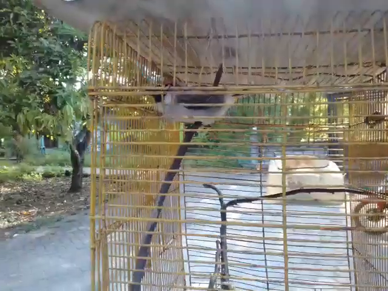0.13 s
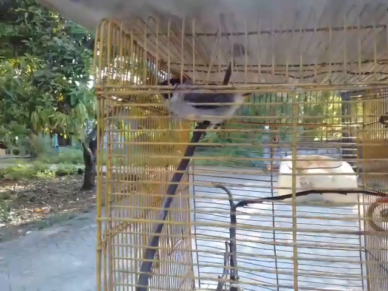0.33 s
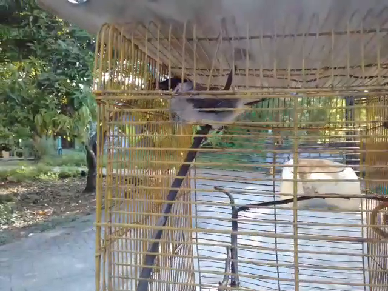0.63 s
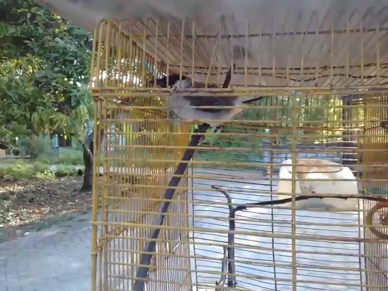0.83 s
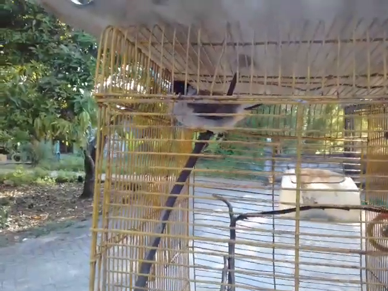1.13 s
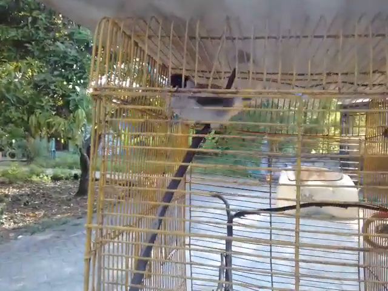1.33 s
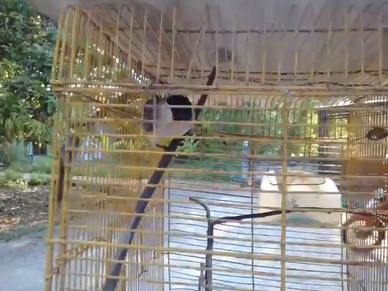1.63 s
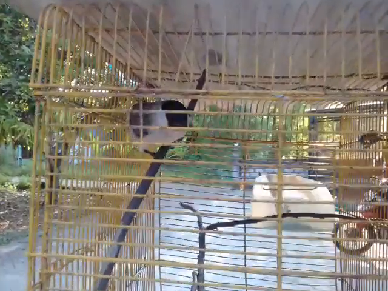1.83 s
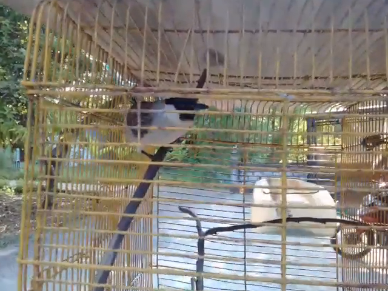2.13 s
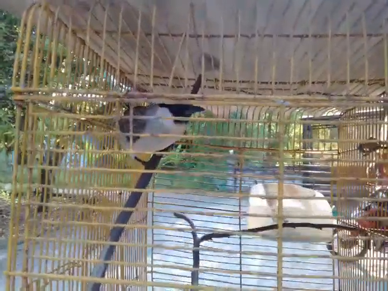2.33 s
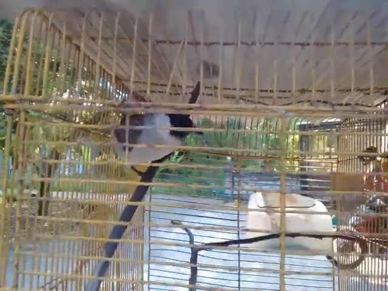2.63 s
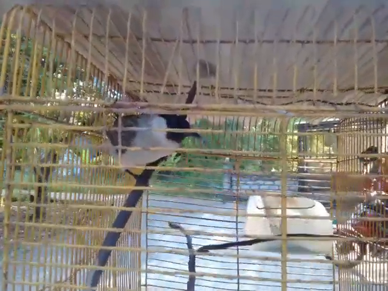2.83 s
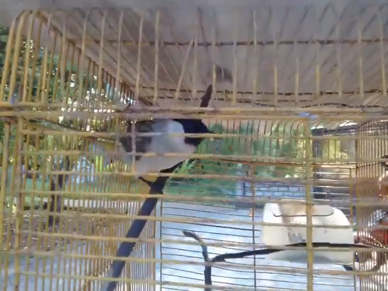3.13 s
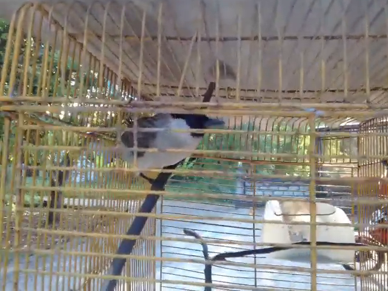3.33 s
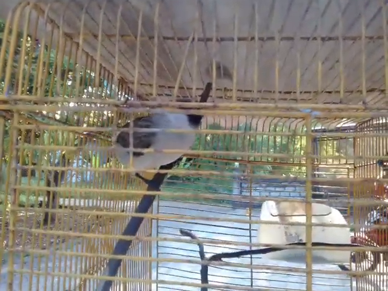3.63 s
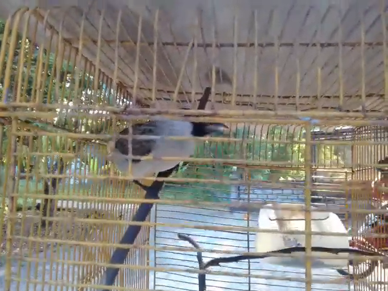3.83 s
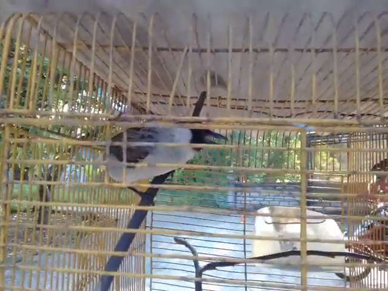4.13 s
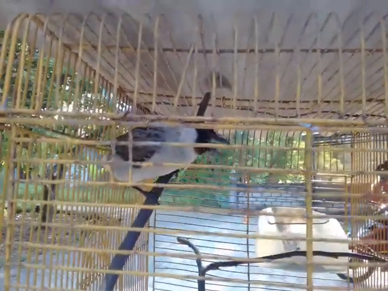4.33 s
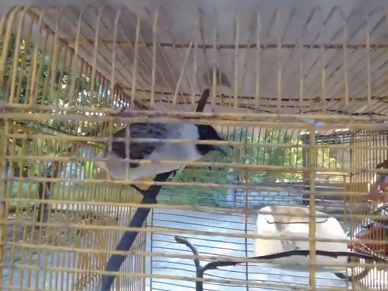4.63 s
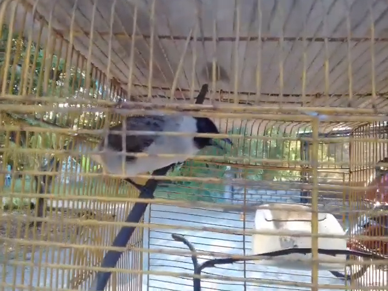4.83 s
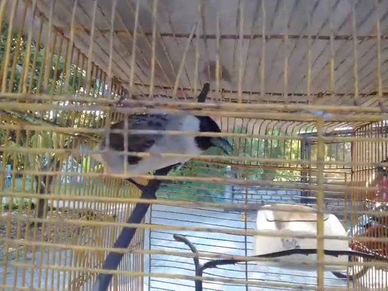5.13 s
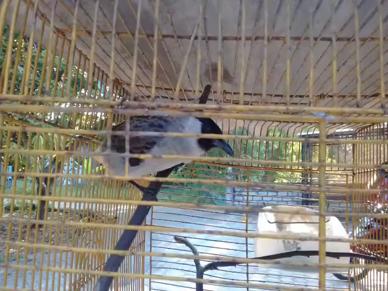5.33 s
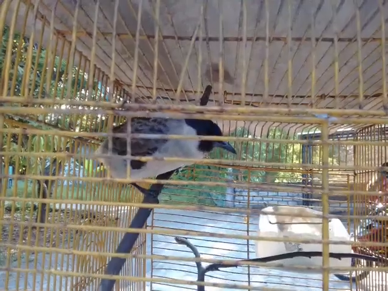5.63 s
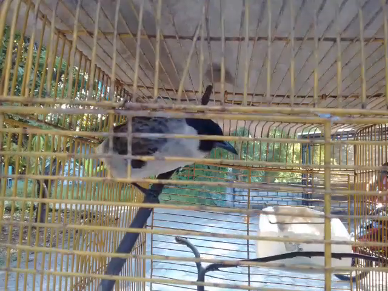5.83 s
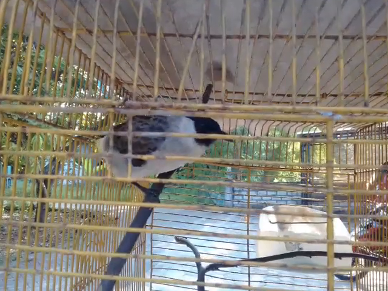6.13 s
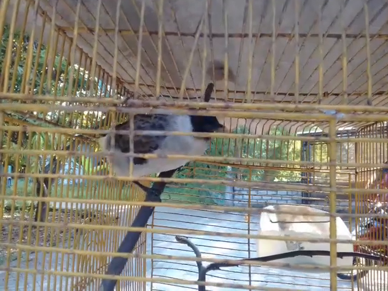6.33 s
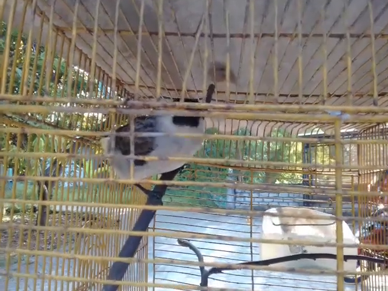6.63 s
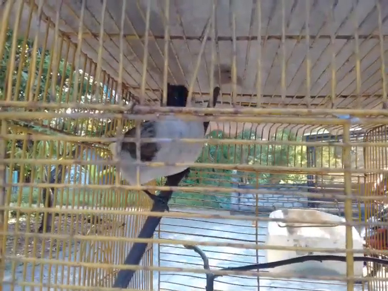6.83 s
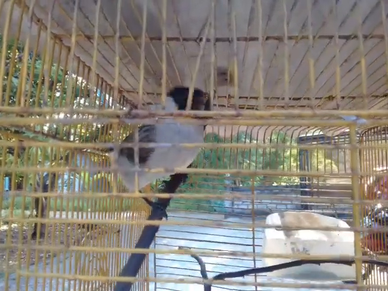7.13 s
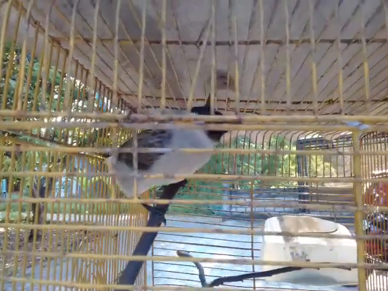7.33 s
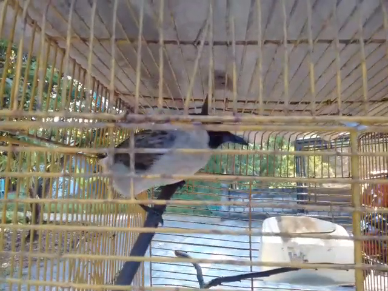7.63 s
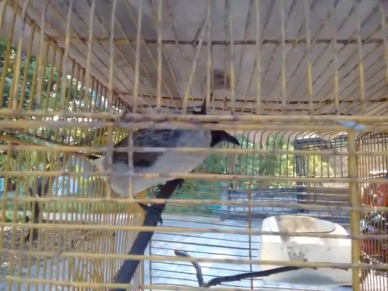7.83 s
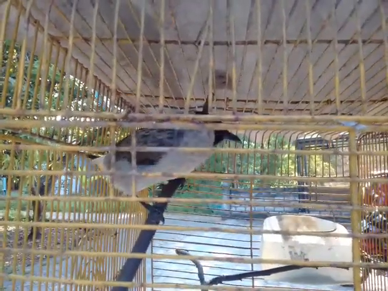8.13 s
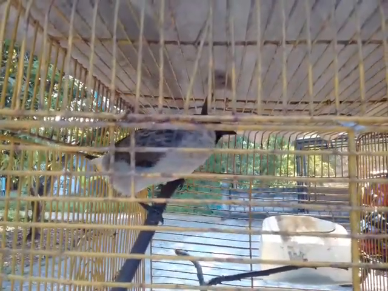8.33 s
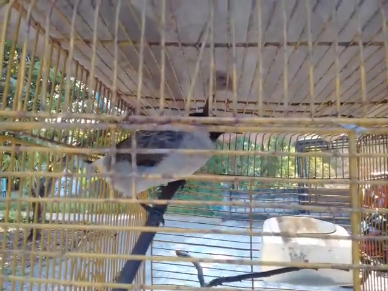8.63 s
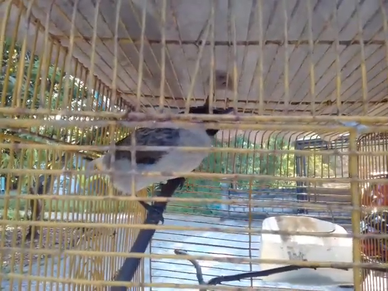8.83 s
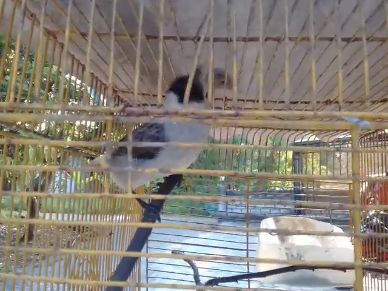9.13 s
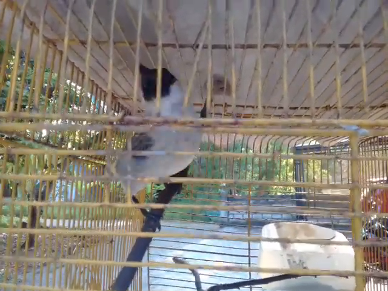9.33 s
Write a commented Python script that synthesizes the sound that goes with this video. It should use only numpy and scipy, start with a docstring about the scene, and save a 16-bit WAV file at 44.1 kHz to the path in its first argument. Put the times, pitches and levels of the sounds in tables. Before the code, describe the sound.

A caged songbird whistles and chirrups close by in short bright phrases, with a few knocks and a faint outdoor hiss.

```python
"""Over a faint outdoor rumble and microphone hiss, a bulbul whistles and chirrups close by, in a wire
cage under an awning; later it sings runs of chip, warbled whistle and falling chirrup. Its syrinx is a
gliding oscillator whose rasp adds pitch jitter, subharmonics and breath noise. A bird rasps faintly,
things swish and knock, claws tick, other birds call from trees and cages, and a far motor grows near
the end. Near surfaces return discrete reflections; the open yard adds a short diffuse tail."""
import sys
import numpy as np
from scipy import signal
from scipy.fft import rfft, irfft, next_fast_len
from scipy.io import wavfile
from scipy.ndimage import uniform_filter1d, minimum_filter1d, map_coordinates

SR = 44100
rng = np.random.default_rng(int(sys.argv[2]) if len(sys.argv) > 2 else 0)


def waveform_to_disk(signal):
    """Save audio, clipped to [-1, 1], as 16-bit WAV at the path in sys.argv[1]."""
    frames = np.transpose(np.atleast_2d(signal))
    scaled = np.clip(frames, -1, 1) * 32767
    samples = np.round(scaled).astype(np.int16)
    wavfile.write(sys.argv[1], SR, samples)


N = 418509
TOP_HZ = 15750  # band limit


def amp(db):
    """Decibels to amplitude ratio."""
    return 10 ** (np.asarray(db) / 20)


def unit(x):
    """Normalisation to rms 1."""
    return x / np.sqrt(np.mean(x ** 2) + 1e-20)


def along(points, hz):
    """Interpolation of (frequency_hz, value) points on a log frequency axis."""
    knots_hz, values = np.transpose(points)
    return np.interp(np.log(hz + 1), np.log(knots_hz + 1), values)


def curves(rows, t):
    """Linear interpolation of each column after the first, time_s, at times t."""
    time_s, *columns = np.transpose(rows)
    return [np.interp(t, time_s, column) for column in columns]


def clock(length_s):
    """Sample times in seconds."""
    return np.arange(int(length_s * SR)) / SR


def wobble(rate_hz, n):
    """Smooth random modulation: a spline through rate_hz Gaussian knots a second."""
    knots = rng.standard_normal(int(n * rate_hz / SR) + 4)
    return map_coordinates(knots, [np.arange(n) * rate_hz / SR])


def filtered(x, response):
    """Zero-phase filtering: the spectrum times a response of frequency."""
    size = next_fast_len(len(x) + 8192)
    return irfft(rfft(x, size) * response(np.fft.rfftfreq(size, 1 / SR)), size)[:len(x)]


def noise(spectrum, n):
    """White noise shaped by (frequency_hz, density_db) points, at rms 1."""
    return unit(filtered(rng.standard_normal(n), lambda hz: amp(along(spectrum, hz))))


def add(track, start_s, x):
    """Superposition of x on the track."""
    part = track[max(0, round(start_s * SR)):][:len(x)]
    part += x[:len(part)]


def phase_of(hz):
    """Phase is the time integral of frequency."""
    return 2 * np.pi * np.cumsum(hz) / SR


def background(rumble_gain_db=-1.5, yard_gain_db=2, hiss_db=-54, motor_hz=186):
    """Traffic, yard and microphone hiss are broadband noise; a far motor adds a harmonic series."""
    # Background level over time, ducking while the bulbul sings loudly: time_s, rumble_db, yard_db
    levels = [(0.6, -58.5, -59.5), (0.75, -58, -56.5), (1.41, -53, -56), (1.69, -62, -57),
              (2.65, -65.5, -58), (3.97, -64, -56), (4.51, -67, -58.5), (5.33, -66.5, -61.5),
              (6.09, -71, -59.5), (6.94, -65, -54), (8.08, -63, -52), (8.5, -63, -53), (9.49, -60.5, -52.5)]
    # Spectra of distant traffic, open yard and microphone: frequency_hz, density_db
    rumble_spectrum = [(25, -27.5), (45, -15), (70, -7.5), (110, 0.5), (180, 1.5), (230, 1.5), (290, -4),
                       (450, -9.5), (650, -23)]
    yard_spectrum = [(250, -19.5), (480, -5.5), (1100, -6.5), (2000, -6), (3500, -7.5), (6000, -19.5),
                     (9000, -27.5)]
    hiss_spectrum = [(3530, -55), (6000, -15), (6740, -9), (7330, -11.5), (8560, -10), (10200, 2.5),
                     (10900, 4.5), (12200, -11.5), (12900, -19.5), (15600, -20.5)]
    # Harmonics of the motor: order, level_db
    motor_orders = [(1, -5), (2, -9), (3, 0)]
    # Envelopes of the motor and of the whole background: time_s, gain_db
    motor_swell = [(0, -79), (7.9, -77), (8.4, -63.5), (9.49, -58.5)]
    fade_in = [(0, -120), (.38, -90), (.41, -10), (.48, -7.5), (.62, 0.5)]
    t = np.arange(N) / SR
    rumble_db, yard_db = curves(levels, t)
    rumble = amp(rumble_db + rumble_gain_db + 0.63 * wobble(6.8, N)) * noise(rumble_spectrum, N)
    yard = amp(yard_db + yard_gain_db + .7 * wobble(6, N)) * noise([(60, -50)] + yard_spectrum, N)
    shaft = phase_of(motor_hz + 4 * wobble(25, N))
    hum = sum(amp(db + 4.5 * wobble(8, N)) * np.sin(k * shaft) for k, db in motor_orders)
    motor = amp(curves(motor_swell, t)[0]) * hum
    hiss = amp(hiss_db) * noise(hiss_spectrum, N)
    return (rumble + yard + motor + hiss) * amp(curves(fade_in, t)[0])


def note(length_s, hz, db, rasp, slide_hz=0, bow_hz=0, rise_db=0, fade_db=0, crest=0.55):
    """Contours of pitch, level and rasp: a parabolic glide that swells to a crest and fades."""
    progress = np.linspace(0, 1, int(length_s * SR))
    pitch = hz + slide_hz * progress + bow_hz * (1 - (2 * progress - 1) ** 2)
    level = db - np.interp(progress, [0, np.clip(crest, .05, .95), 1], [rise_db, 0, fade_db])
    return np.array([pitch, level, np.full(len(progress), np.clip(rasp, 0, 1))])


def warbled(contours, rate_hz, depth_hz, depth_db, first_top_s, drift_rad=0.14, uneven_db=2.5):
    """Frequency and amplitude modulation by one slightly uneven swing."""
    hz, db, rasp = contours
    n = len(hz)
    angle = 2 * np.pi * rate_hz * (np.arange(n) / SR - first_top_s) + drift_rad * wobble(rate_hz, n)
    swing = np.cos(angle) * amp(uneven_db * wobble(rate_hz, n))
    return np.array([hz + depth_hz * swing, db + depth_db * swing, rasp])


def legato(*notes, glide_s=0.0047, edge_s=0.0044, quiet_db=-23.5):
    """Smoothing joins notes under one envelope, giving rows of time_s, pitch_hz, level_db, rasp."""
    hz, db, rasp = uniform_filter1d(np.hstack(notes), size=int(glide_s * SR), axis=1)
    t = np.arange(len(hz)) / SR
    opening = np.minimum(1, np.minimum(t, t[-1] - t) / edge_s)
    return np.transpose([t, hz, db + quiet_db * (1 - opening), rasp])


def whistle():
    """A frequency-modulated note sinks, climbs back and settles on a nearly pure, sagging tone."""
    sink = note(.036, 3508, db=0.5, rasp=0.26, slide_hz=-430, bow_hz=60.4,
                rise_db=12.5, fade_db=5.5, crest=0.53)
    warble = warbled(sink, rate_hz=82, depth_hz=475, depth_db=3.5, first_top_s=.0028)
    climb = note(.012, 3540, db=-1.5, rasp=0.16, slide_hz=120, bow_hz=-62,
                 rise_db=3, fade_db=3.5, crest=.3)
    pure = note(0.057, 4063, db=1.5, rasp=.02, slide_hz=-321.4, bow_hz=20,
                rise_db=8.5, fade_db=9.5, crest=0.7)
    return legato(warble, climb, pure)


def chirrup(low_db, scoop_hz):
    """The fundamental leaps nearly an octave, holds, catches, falls back and flicks up."""
    low = note(.032, 1800, db=low_db, rasp=.24, slide_hz=-51, bow_hz=-59,
               rise_db=9, fade_db=0.5, crest=0.78)
    held = note(.0375, 3234 - scoop_hz, db=3, rasp=0.048, slide_hz=scoop_hz,
                bow_hz=70 + 0.43 * scoop_hz, rise_db=8, fade_db=4, crest=.36)
    catch = note(0.0077, 2640, db=1, rasp=.1)
    sag = note(.031, 2918, db=2, rasp=0.15, slide_hz=-350.6, bow_hz=70.5,
               rise_db=1.5, fade_db=2.5, crest=0.93)
    fall = note(.0145, 2567.4, db=0, rasp=0.13, slide_hz=-710, bow_hz=-92.5, fade_db=11.5, crest=0.085)
    flick = note(.019, 3130, db=3, rasp=0.13, slide_hz=-51, rise_db=5.5, fade_db=16, crest=0.11)
    return legato(low, held, catch, sag, fall, flick)


def syrinx(shape, stretch, pitch_ratio, first_db, second_db, octave_db, upper_db):
    """Source and filter: a harmonic oscillator; rasp adds jitter, period doubling and breath noise."""
    # Interference of close reflections at the fundamental: frequency_hz, gain_db
    interference = [(1750, 6.5), (2100, 3), (2350, 3), (2650, 5.5), (2900, -9.5), (3060, -4.5), (3330, 2),
                    (3530, -0.5), (3780, 4), (4000, 0.5), (4500, -4)]
    # Response of beak and microphone to the overtones: frequency_hz, gain_db
    overtone_response = [(3400, -15), (4200, -16), (5600, -32), (6650, -44.5), (7650, -33), (8500, -29.5),
                         (10000, -9), (11300, 3.5), (12200, -4), (13300, -20), (14000, -10.5), (15500, -22)]
    # Air passing the syrinx: frequency_hz, density_db
    breath_spectrum = [(1000, -32), (2800, -22.5), (4500, 3), (6500, -8), (9000, 7.5), (11500, -3.5),
                       (15500, -13)]
    length_s = shape[-1][0]
    t = clock(length_s * stretch) / stretch
    hz, db, rasp = uniform_filter1d(np.array(curves(shape, t)), size=64, axis=1)
    hz = hz * pitch_ratio
    jitter = (.0015 + .025 * rasp) * wobble(1500, len(t)) + .025 * rasp * wobble(250, len(t))
    phase = phase_of(hz * (1 + jitter))
    tone = amp(along(interference, hz)) * np.sin(phase)
    doubled_period = np.sin(phase / 2) + 0.81 * np.sin(1.5 * phase)
    tone += (amp(-45) + rasp * amp(-31)) * doubled_period
    for k in np.arange(2, 7, .5):
        lift_db = octave_db if k == 2 else upper_db + 5 * rasp
        rolloff_db = 3 * max(0, k - 4)
        strength = amp(along(overtone_response, k * hz) + lift_db - rolloff_db)
        if k % 1:  # lines halfway between the harmonics
            strength *= amp(-3) * (rasp + 0.034)
        tone += strength * (k * hz < SR / 2) * np.sin(k * phase)
    tone += amp(-25) * rasp * noise(breath_spectrum, len(t))
    flutter_db = 2.5 * rasp * wobble(400, len(t))
    effort_db = np.interp(t / length_s, [.42, .55], [first_db, second_db])
    return np.sqrt(2) * amp(db + effort_db + flutter_db) * tone


def reverberation(x, gap_s=0.0087):
    """The yard's diffuse field: convolution with decaying noise that dies fastest near 8 kHz."""
    # Reverberation time of the yard: frequency_hz, t60_s
    decay = [(300, 0.32), (3000, 0.53), (8000, 0.077), (14000, 0.29)]
    hz, t, spectra = signal.stft(rng.standard_normal(SR * 3 // 4), SR, nperseg=256)
    envelope = amp(-60 * t / along(decay, hz)[:, None])
    tail = signal.istft(spectra * envelope, SR, nperseg=256)[1]
    tail[:int(gap_s * SR)] = 0
    return signal.fftconvolve(x, tail / np.linalg.norm(tail))


def bulbul(wet_db=-19):
    """The song arrives as direct sound, early reflections and a reverberant tail."""
    # Syllables: start_s, stretch, pitch_ratio, first_half_db, second_half_db, octave_db, upper_db
    whistles = [(0.419, 0.92, 0.98, -31, -24, 1, -37), (3.547, 0.91, 0.98, -12.5, -12, -3, -30),
                (4.011, 0.91, 0.98, -7, -10, 12, -25.5), (4.483, 0.9, 1.007, -8.5, -8.5, 12.5, -20.5),
                (5.025, 0.91, 0.98, -9.5, -11, 14, -18), (7.177, 0.84, 0.965, -20.5, -16, 5, -20.5),
                (9.238, 0.85, 0.97, -20.5, -16.5, 16, -19.5)]
    chips = [(3.484, 0.59, 1.07, -10, -17.5, -6, -27), (3.924, 0.93, 0.99, -10, -12, 5, -20),
             (4.394, 1, 1.006, -9.5, -12.5, 9.5, -25), (4.933, 0.92, 1.047, -9.5, -14.5, 11, -23.5),
             (7.088, 0.98, .98, -53, -28, -13, -23), (9.148, 1, .98, -55, -29, 23, -21)]
    peeps = [(6.988, 1, 0.95, -35.5, -38, -14, -10), (9.077, 0.75, 0.95, -37.5, -39.5, 4, 3)]
    # Chirrups: the same columns, then low_note_db, scoop_hz
    chirrups = [(0.569, 1.02, 1.015, -24.5, -18, 8.5, -12, -14.5, -1),
                (3.701, 1.016, 1.025, -16.5, -15.5, 3, -4, -16, -0.5),
                (4.166, 1.011, 1.024, -14.5, -13, 5, -1, -17, -0.5),
                (4.648, 1.026, 1.016, -14.5, -15, 5.2, -1, -17, 2),
                (5.194, 1.037, .995, -19, -17.5, 5.5, 0.5, -14.5, 75.5),
                (7.314, 1.06, .99, -28.5, -22.5, -2.5, -9.5, -35, 399),
                (9.387, 1.05, 0.99, -30, -21.5, 4, -6, -7.5, 81)]
    # Reflections from awning and walls: delay_s, gain_db
    reflections = [(.0031, -14.5), (.0074, -13.5), (.0128, -21.5), (.0265, -32.5), (.036, -43.5)]
    syllables = []
    for contour, rows in ((chip, chips), (whistle, whistles), (peep, peeps)):
        syllables += [(start_s, contour(), manner) for start_s, *manner in rows]
    for start_s, *manner, low_db, scoop_hz in chirrups:
        syllables.append((start_s, chirrup(low_db, scoop_hz), manner))
    direct, reflected = np.zeros(N), np.zeros(N)
    for start_s, shape, manner in syllables:
        call = syrinx(shape, *manner)
        add(direct, start_s, call)
        add(reflected, start_s, amp(wet_db) * reverberation(call))
    for delay_s, db in reflections:
        add(reflected, delay_s, amp(db) * direct)
    return direct + reflected


def rasp_and_swishes(gain_db=-3, wet_db=-6):
    """A bird's faint harsh rasp, then soft swishes: amplitude-modulated bands of noise."""
    # The rasp (first row) and the swishes: crest_s, rise_s, fall_s, centre_hz, level_db
    bursts = [(0.828, 0.026, 0.068, 5880, -36), (1.15, .03, 0.033, 4970, -40),
              (1.35, .1, 0.11, 4920, -34.5), (6.186, .04, .13, 5190, -42.5),
              (6.31, .035, 0.043, 5460, -35.5), (6.62, 0.066, 0.098, 5630, -43.5),
              (8.372, 0.061, 0.036, 4200, -49.5)]
    # Their spectrum: ratio_to_centre, density_db
    colour = [(.4, -20), (.7, -8.5), (.9, -2), (1.1, -3), (1.45, -21), (2, -6), (2.8, -30.5)]
    out = np.zeros(N)
    for crest_s, rise_s, fall_s, centre_hz, db in bursts:
        t = clock(rise_s + fall_s)
        from_crest = np.interp(t, [0, rise_s, rise_s + fall_s], [-1, 0, 1])
        swell_db = -20 * np.abs(from_crest) ** 1.5 + 1.3 * wobble(200, len(t))
        spectrum = [(centre_hz * ratio, level) for ratio, level in colour]
        burst = amp(db + gain_db + swell_db) * noise(spectrum, len(t))
        add(out, crest_s - rise_s, burst)
        add(out, crest_s - rise_s, amp(wet_db) * reverberation(burst))
    return out


def claws(gain_db=-5, t60_s=0.04):
    """Light impacts on perch and wire: bright noise bursts with exponential decay."""
    # Claw ticks: start_s, level_db
    ticks = [(1.084, -45), (1.2304, -31.5), (1.497, -24.5), (2.062, -33), (3.1462, -38), (3.2899, -35.5),
             (5.5847, -39), (5.998, -34.5), (6.509, -33), (8.266, -36)]
    # Their spectrum: frequency_hz, density_db
    spectrum = [(300, -20), (2000, -5.5), (7000, -14.5), (11000, 11), (15000, -19)]
    out, t = np.zeros(N), clock(0.082)
    for start_s, db in ticks:
        add(out, start_s, amp(db + gain_db - 60 * t / t60_s) * noise(spectrum, len(t)))
    return out


def knocks(gain_db=-10, wet_db=-4, crack_t60_s=0.041, clatter_t60_s=0.085, ring_t60_s=0.097):
    """Each impact excites a broadband crack and clatter and a hollow ring of damped modes."""
    # Blows in the yard: start_s, level_db, body_db, treble_db
    blows = [(1.154, -36, 9.5, 16), (1.758, -30.5, -12, -13.5), (3.21, -43.5, 8, -16),
             (3.408, -34, -9.5, -23), (3.458, -25, -5, -11.5), (3.677, -35.5, 1.5, -20.5),
             (5.485, -23.5, -4.5, -4.5), (5.808, -29.5, -5, -9.5), (6.634, -26.5, -8.5, -4.5),
             (6.873, -17, -12, -5), (6.911, -11.5, -4.5, -3.5), (7.795, -25, -7, -11),
             (7.861, -22, 3.5, 12), (7.911, -8, -3, -3)]
    # Spectrum of the clatter: frequency_hz, density_db
    spectrum = [(120, -49), (250, -8.5), (450, -18), (750, -11), (1150, 6), (1450, -1), (1900, 2),
                (3500, -5), (5800, -9.5), (8600, -7), (10800, 6), (15500, -28)]
    # Modes of the ring: frequency_hz, width_hz, level_db
    modes = [(493.4, 80, -4.5), (722, 87, 1), (955, 150, 0.5), (1120, 116, 2), (1592, 40, -0.5),
             (1870, 79, -20.5), (2360, 92, -9)]
    out, t = np.zeros(N), clock(.2)
    attack = 1 - np.exp(-t / 0.00224)
    decay = amp(-60 * t / clatter_t60_s) + amp(-2 - 60 * t / crack_t60_s)
    for start_s, db, body_db, treble_db in blows:
        tint = [(1200, body_db), (3500, 0), (10000, treble_db)]
        clatter = unit(filtered(noise(spectrum, len(t)), lambda hz: amp(along(tint, hz))))
        ring = np.zeros(len(t))
        for mode_hz, width_hz, mode_db in modes:
            strength = amp(mode_db + rng.normal(0, 3.8))
            ring += strength * np.sin(phase_of(mode_hz + width_hz / 2 * wobble(130, len(t))))
        ring = unit(ring) * amp(body_db - 5 - 60 * t / ring_t60_s)
        knock = (clatter * decay + ring) * amp(db + gain_db) * attack
        add(out, start_s, knock)
        add(out, start_s, amp(wet_db) * reverberation(knock))
    return out


def slur(length_s, first_hz, last_hz, waver_hz):
    """A tapered sine sweep with random frequency modulation, at rms 1."""
    n = int(length_s * SR)
    hz = np.linspace(first_hz, last_hz, n) + waver_hz * wobble(150, n)
    return unit(np.sin(phase_of(hz)) * signal.windows.tukey(n, .5))


def tree_birds(droop=0.0824, direct_db=-10, wet_db=1):
    """Drooping whistles from beyond the critical distance: reverberation outweighs direct sound."""
    # Calls from the trees: start_s, length_s, pitch_hz, level_db
    calls = [(1.479, 0.031, 3800, -49.5), (1.515, 0.042, 3260, -53), (1.672, 0.031, 3270, -50),
             (1.699, 0.027, 2840, -47), (1.791, 0.027, 2410, -48), (2.285, .067, 3500, -49.5),
             (2.376, 0.046, 2960, -42), (2.445, 0.053, 3320, -44.5), (2.489, 0.063, 3043, -41.5),
             (2.691, 0.097, 2467, -46.5), (2.937, 0.043, 3450, -46), (3.024, 0.069, 3594, -45.5),
             (3.24, 0.037, 547, -65), (4.42, 0.026, 555, -75), (5.223, 0.039, 546, -68.5),
             (6.446, 0.037, 2443, -50), (7.5, .14, 3136, -44), (7.872, .036, 3510, -41),
             (8.035, 0.064, 3250, -42), (8.112, 0.066, 3023, -42.5), (8.411, 0.047, 3495, -41),
             (8.522, 0.28, 3020, -46), (8.803, .038, 3520, -46)]
    out = np.zeros(N)
    for start_s, length_s, hz, db in calls:
        call = amp(db) * slur(length_s, hz * (1 + droop / 2), hz * (1 - droop / 2), waver_hz=105)
        add(out, start_s, amp(direct_db) * call)
        add(out, start_s, amp(wet_db) * reverberation(call))
    return out


def neighbour_birds():
    """Nearer, so drier: faint slurs, with an octave where it lies under the band limit."""
    # Calls from the next cages: start_s, length_s, first_hz, last_hz, level_db, octave_db, wet_db
    calls = [(1.805, .093, 6140, 6770, -61, -8, 2), (1.812, 0.11, 9550, 10000, -50.5, -40, 5.5),
             (5.995, 0.0112, 3500, 4850, -39, -6, -6.5), (6.003, .013, 4340, 5760, -42, 6, -4),
             (6.65, 0.028, 13400, 13700, -37.5, -31, -9), (7.478, 0.013, 5250, 5540, -45.5, -3, -9),
             (7.521, 0.027, 13300, 13750, -35, -40, -1), (8.7, 0.049, 5600, 6600, -58, 9, -16),
             (8.808, 0.076, 6470, 5520, -39.5, -9.5, -16)]
    out = np.zeros(N)
    for start_s, length_s, first_hz, last_hz, db, octave_db, wet_db in calls:
        in_band = 2 * last_hz < TOP_HZ
        octave = amp(octave_db) * in_band * slur(length_s, 2 * first_hz, 2 * last_hz, waver_hz=50)
        call = amp(db) * (slur(length_s, first_hz, last_hz, waver_hz=25) + octave)
        add(out, start_s, call)
        add(out, start_s, amp(wet_db) * reverberation(call))
    return out


def chip():
    """The bulbul's squeak and thin lead-in break into a buzz of fast frequency modulation."""
    squeak = note(.022, 5300, db=-35, rasp=0.54, bow_hz=482, rise_db=12.5, fade_db=12.5)
    lead = note(.0205, 4320, db=-17, rasp=1, rise_db=10, crest=.7)
    rise = note(.022, 3450, db=1, rasp=0.64, slide_hz=337, bow_hz=-56,
                rise_db=4.5, fade_db=11, crest=.35)
    buzz = warbled(rise, rate_hz=135, depth_hz=472, depth_db=-1, first_top_s=.0085)
    return legato(squeak, lead, buzz)


def peep():
    """The bulbul's soft single note: a fundamental that rises and levels off."""
    return legato(note(0.044, 2007, db=3.5, rasp=.01, slide_hz=240, bow_hz=170,
                       rise_db=7, fade_db=13, crest=0.42))


def scene():
    """All sources superpose at one microphone."""
    return (background() + bulbul() + rasp_and_swishes() + claws() + knocks()
            + tree_birds() + neighbour_birds())[None]


def record(dry):
    """Peak limiting lowers the gain around the loudest samples; a low-pass sets the band limit."""
    ceiling = .93
    needed_gain = np.minimum(1, ceiling / (np.abs(dry[0]) + 1e-9))
    gain = uniform_filter1d(minimum_filter1d(needed_gain, size=128), size=128)
    return filtered(dry[0] * gain, lambda hz: hz < TOP_HZ)[None]


dry = scene()
out = record(dry)
waveform_to_disk(out)
```